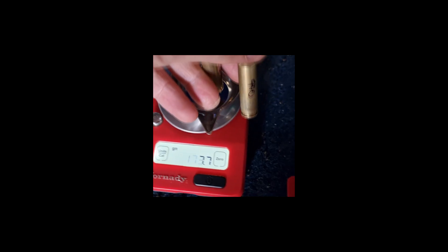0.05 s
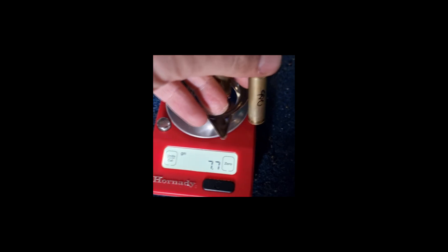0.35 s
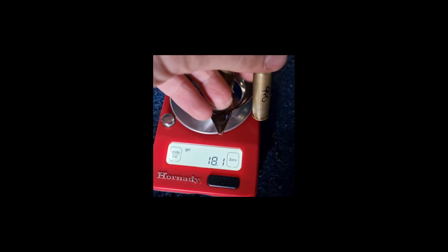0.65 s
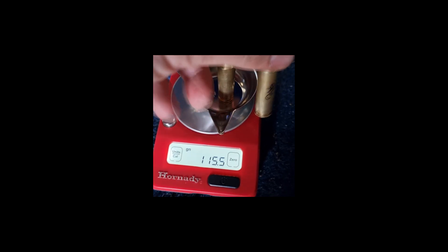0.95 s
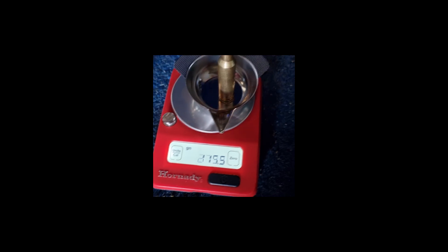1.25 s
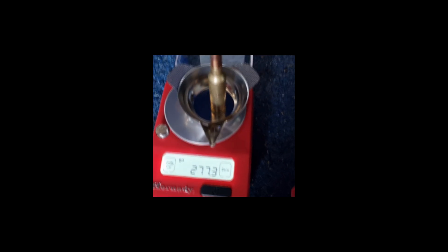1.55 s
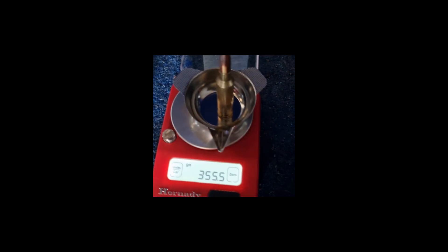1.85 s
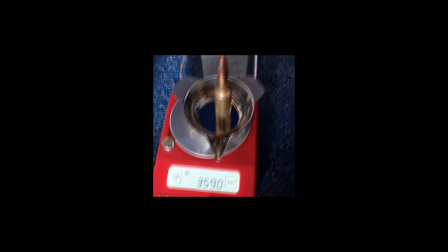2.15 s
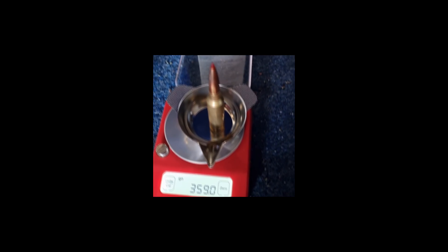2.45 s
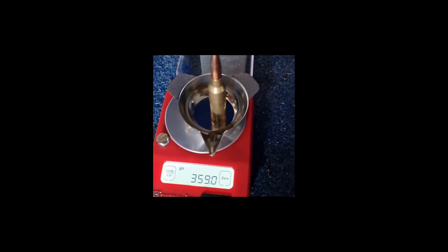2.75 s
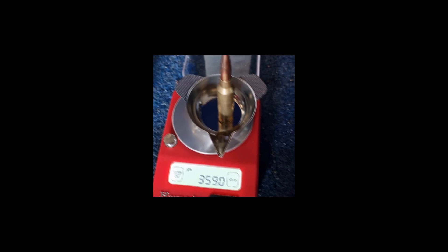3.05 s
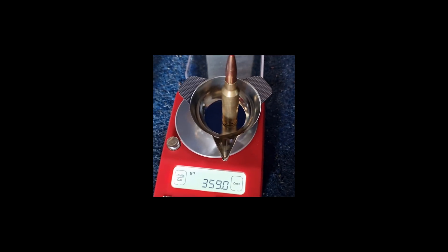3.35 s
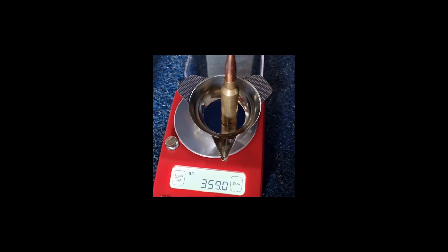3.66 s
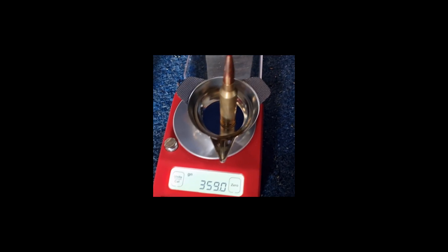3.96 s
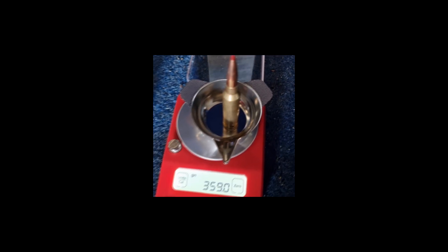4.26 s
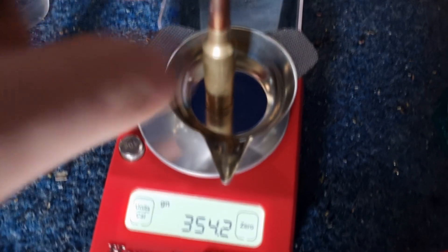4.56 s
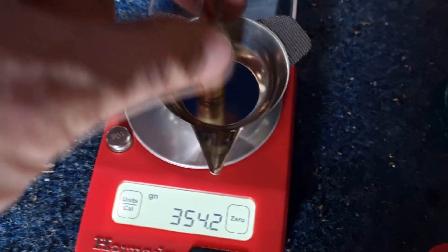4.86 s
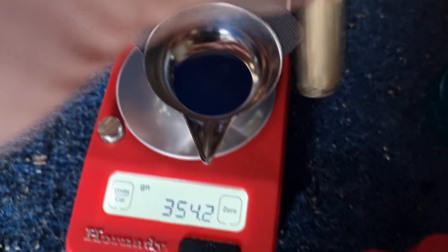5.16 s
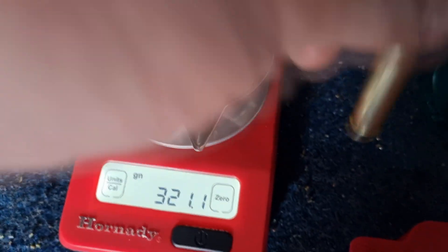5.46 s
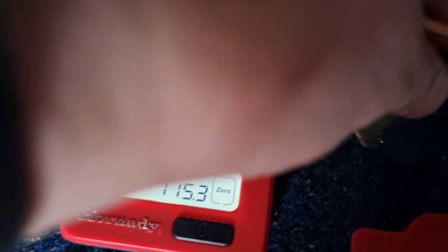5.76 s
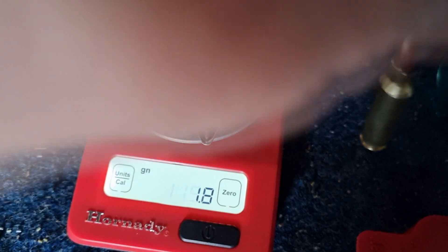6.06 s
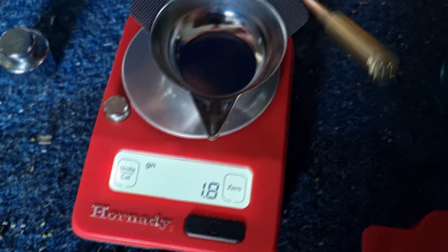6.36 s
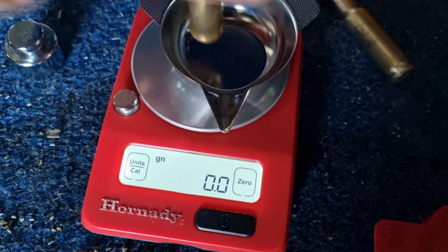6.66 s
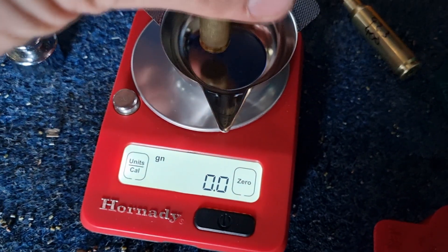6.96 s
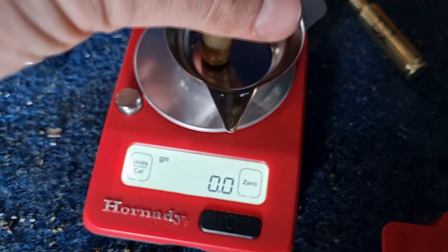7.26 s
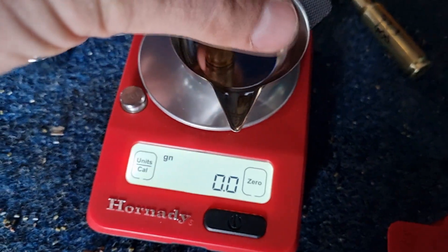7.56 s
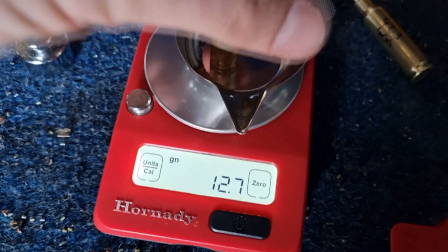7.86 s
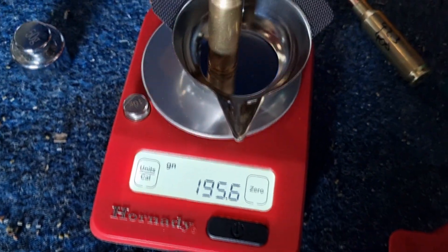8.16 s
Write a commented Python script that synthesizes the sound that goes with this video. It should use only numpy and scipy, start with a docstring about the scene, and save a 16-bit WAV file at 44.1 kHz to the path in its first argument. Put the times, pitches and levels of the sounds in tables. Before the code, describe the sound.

A brass cartridge clinks into a small steel scale pan, followed by close plastic snaps and creaks and a few soft bench thuds.

```python
"""A brass cartridge clinks and chatters into the steel pan of a small scale; pan and case both ring.
Plastic snaps and creaks as the grip shifts on a handheld camera close by.
The sound drops out briefly between two shots; then the padded bench is bumped and a case ticks on the pan.
Under it all run low rumble, microphone hiss and the fizz of the lens motor."""
import sys
import numpy as np
from scipy import signal
from scipy.fft import rfft, irfft
from scipy.io import wavfile
from scipy.ndimage import uniform_filter1d

SR = 44100
rng = np.random.default_rng(int(sys.argv[2]) if len(sys.argv) > 2 else 0)


def wav_out(sig):
    """Save sig, one row per channel (or a flat mono array), as 16-bit PCM at SR to the path in sys.argv[1]."""
    wavfile.write(sys.argv[1], SR, np.round(np.clip(np.atleast_2d(sig).T, -1, 1) * 32767).astype(np.int16))


N = 361962
TIME = np.arange(N) / SR
EVENT_TIME = TIME[:SR // 2]
GAP_START_S, GAP_END_S = 4.407, 4.445
SECOND_SHOT = TIME > GAP_START_S


def amp(db):
    return 10 ** (np.asarray(db) / 20)


def unit_rms(x):
    return x / np.sqrt(np.mean(x ** 2) + 1e-20)


def unit_blow(x):
    """Scales to the energy of 10 ms at rms 1."""
    return x / np.sqrt(np.mean(x ** 2) * x.shape[-1] / (SR / 100))


def at_hz(curve, hz):
    knots_hz, values = np.transpose(curve)
    return np.interp(np.log(hz + 1), np.log(knots_hz + 1), values)


def gain_curve(rows):
    return amp(np.interp(TIME, *np.transpose(rows)))


def flicker(depth_db, per_s):
    knots_s = np.arange(0, N / SR + 1, 1 / per_s)
    return amp(depth_db * np.interp(TIME, knots_s, rng.standard_normal(len(knots_s))))


def add(mix, start_s, sound):
    part = mix[:, round(start_s * SR):][:, :sound.shape[-1]]
    part += sound[..., :part.shape[1]]


def colour(x, spectrum, tilt=0, size=4096):
    """Minimum-phase filter; tilt in dB per octave from 400 to 5000 Hz."""
    hz = abs(np.fft.fftfreq(size, 1 / SR))
    db = at_hz(spectrum, hz) + tilt * np.log2(np.clip(hz, 400, 5000) / 1000)
    log_response = np.conj(signal.hilbert(np.log(amp(db))))
    taps = np.fft.ifft(np.exp(log_response)).real
    return signal.oaconvolve(x, taps[None, :size // 2], axes=1)[:, :x.shape[1]]


# Left-right likeness: freq_hz, correlation
MIC_CORRELATION = [(60, 0.89), (130, 0.97), (300, 0.87), (550, 0.62), (1000, 0.5), (2200, 0.0033),
                   (5000, 0.032)]

def noise(size):
    """White noise at two microphones, alike in the bass, unrelated in the treble."""
    left, other = rfft(rng.standard_normal((2, size)))
    likeness = at_hz(MIC_CORRELATION, np.fft.rfftfreq(size, 1 / SR))
    return irfft([left, likeness * left + np.sqrt(1 - likeness ** 2) * other], size)


# Rumble spectrum: freq_hz, density_db
RUMBLE_SPECTRUM = [(15, -36), (28, -16.5), (42, -2.5), (60, 2.5), (80, -1), (130, -6), (240, -12.5),
                   (430, -29), (600, -40), (1000, -54), (2000, -88.5)]
# Rumble contour, first shot: time_s, relative_db
RUMBLE_CONTOUR = [(0.0, -60.5), (0.77, -57.5), (1.11, -58.5), (1.8, -52.5), (2.5, -60.5), (4.15, -56.5),
                  (4.38, -60)]

def rumble():
    """Low wavering noise, duller in the second shot."""
    low = unit_rms(colour(noise(N), RUMBLE_SPECTRUM))
    dull = unit_rms(colour(low, [(60, 0.5), (130, -7.0), (300, -7.5)]))
    first = low * gain_curve(RUMBLE_CONTOUR) * amp(3) * amp([[-0.9], [0.9]])
    second = dull * amp(-61) * amp([[1.5], [-1.5]])
    return np.where(SECOND_SHOT, second, first) * flicker(depth_db=3.0, per_s=19)


# Hiss spectrum: freq_hz, density_db
HISS_SPECTRUM = [(100, 2), (500, 3.5), (1000, -0.5), (2000, -2), (3500, -2), (5000, -0.5), (6800, -5.5),
                 (8500, -10.5), (10500, -7), (13000, 1), (16000, -1)]

def hiss():
    """Steady self-noise of the microphones."""
    return amp(-74.5) * unit_rms(colour(noise(N), HISS_SPECTRUM))


def fizz(spectra, effort, left_db, right_db):
    """Motor noise reaches each microphone through the camera's own resonances."""
    sides = [unit_rms(colour(rng.standard_normal((1, N)), spectrum)) for spectrum in spectra]
    return np.vstack(sides) * gain_curve(effort) * amp([[left_db], [right_db]])


def hunting(per_s, step_s, steady_power, uneven_db):
    """Gain of a motor hunting in short uneven steps, each a small surge."""
    surge = EVENT_TIME / step_s * np.exp(1 - EVENT_TIME / step_s)
    steps = rng.random(N) < per_s / SR
    strength = amp(uneven_db * np.minimum(rng.standard_normal(N), 2))
    power = steady_power + signal.oaconvolve(steps * strength ** 2, surge ** 2)[:N]
    return np.sqrt(abs(power / power.mean()))


# Fizz spectra per shot, left then right: freq_hz, density_db
FIRST_FIZZ_SPECTRA = ([(700, -16), (1900, -16.5), (2400, -3), (2850, -0.5), (3250, -9.5), (3900, -6.5),
                      (4400, -11), (4900, -3), (6000, -10), (7500, -14.5), (8800, -29), (11000, -22),
                      (13500, -11.5), (16000, -15.5)], [(700, -4), (2000, -10), (2700, -7), (3300, -10.5),
                      (3900, -3), (4400, -5), (5000, 0), (5600, -2.5), (6300, 1.5), (7600, -7), (8500, -26),
                      (13500, -9.5), (16000, -9.5)])
SECOND_FIZZ_SPECTRA = ([(2200, -27), (2900, -3.5), (3450, 2.5), (4300, -11.5), (5000, 0.5), (5600, -9.5),
                       (6000, -13), (6450, -1), (7500, -9), (8300, -34.5)], [(1900, -46), (2150, -26.5),
                       (2450, -4), (2850, 2), (3200, -3), (3550, -18.5), (4250, -21.5), (5000, -25.5),
                       (5700, -49)])
# Motor effort per shot: time_s, relative_db
FIRST_EFFORT = [(0.0, -82.5), (0.6, -84.5), (1.11, -82.5), (2.18, -78), (2.32, -81.5), (4.28, -81),
                (4.38, -78.5)]
SECOND_EFFORT = [(4.48, -75), (4.97, -71.5), (5.44, -69), (5.88, -74.5), (6.16, -72), (6.32, -69.5),
                 (7.76, -71), (8.2, -68)]

def lens_motor():
    """The motor fizzes throughout and hunts in the second shot."""
    first = fizz(FIRST_FIZZ_SPECTRA, FIRST_EFFORT, left_db=12.5, right_db=7)
    first *= flicker(depth_db=1.46, per_s=25)
    second = fizz(SECOND_FIZZ_SPECTRA, SECOND_EFFORT, left_db=-3.5, right_db=7)
    second *= hunting(per_s=37, step_s=0.0028, steady_power=0.48, uneven_db=3.5)
    second *= flicker(depth_db=1.34, per_s=14)
    return np.where(SECOND_SHOT, second, first)


def crack(t60_s, direct, contact_s):
    """A contact's force pulse plus dense scatter from things close by."""
    scatter = unit_blow(noise(len(EVENT_TIME)) * amp(-60 * EVENT_TIME / t60_s))
    pulse = unit_blow(EVENT_TIME * np.exp(-EVENT_TIME / contact_s))
    return scatter + direct * pulse


def ring(modes, spread_rad_per_khz, tilt=0):
    """Decaying modes; phase differs more between the microphones at high pitch."""
    hz, db, t60_s = np.transpose(modes)[:, :, None]
    phase = np.minimum(spread_rad_per_khz * hz / 1000, np.pi) * rng.uniform(-1, 1, (2, len(modes), 1))
    rise = 1 - np.exp(-(5 * hz * EVENT_TIME) ** 2)
    envelope = rise * amp(db + tilt * np.log2(hz / 1000) - 60 * EVENT_TIME / t60_s)
    return unit_blow((envelope * np.sin(2 * np.pi * hz * EVENT_TIME + phase)).sum(1))


# Brass on the pan: start_s, crack_db, tilt_db_per_octave, ring_db
PAN_HITS = [(0.4328, -25.5, -2, -35), (0.4364, -23, 0.1, -28), (0.5915, -51.5, 2, -59),
            (0.602, -50, 3, -50.5), (0.633, -56, 2, -67), (5.050, -77, 6, -89), (5.279, -64.5, 8.5, -83),
            (7.341, -56.5, 3.5, -63.5)]
# Contact spectrum: freq_hz, density_db
CRACK_SPECTRUM = [(60, -22.5), (100, -8.5), (400, -32.5), (650, -19), (850, -14.5), (1400, -6.5),
                  (2040, -5), (2600, -4.5), (3100, -13), (3500, -7), (5000, -9.5), (6800, -18.5),
                  (7800, -9.5), (9200, -29.5), (11000, -27.5), (14000, -16), (16000, -25.5)]
# Steel pan and brass case modes: pitch_hz, relative_db, t60_s
PAN_MODES = [(772, -17.5, 0.25), (1152, -12.5, 0.19), (1640, -10, 0.33), (2120, -2.5, .16),
             (2250, -10, 0.2), (2556, -3.5, 0.13), (2600, 4.5, 0.091), (3144, -16, .3), (3467, -2, 0.22),
             (3850, -15.5, 0.26), (4260, -13.5, .26), (4630, -17, 0.3), (6557, -15, 0.21),
             (6570, -18, 0.11), (8414, -21, 0.21)]
CASE_MODES = [(3900, -18.5, .08), (5175, 1, 0.083), (5780, -3, 0.19), (7900, -17, .15)]

def clinks():
    """Each contact cracks and rings both pan and case."""
    out = np.zeros((2, N))
    for start_s, crack_db, tilt, ring_db in PAN_HITS:
        contact = crack(t60_s=0.048, direct=0.57, contact_s=0.00002)
        contact = amp(crack_db) * unit_blow(colour(contact, CRACK_SPECTRUM, tilt))
        pan = amp(ring_db) * ring(PAN_MODES, spread_rad_per_khz=0.3)
        case_db = -18 + 0.67 * ring_db  # rings even at a light touch
        case = amp(case_db) * ring(CASE_MODES, spread_rad_per_khz=0.2)
        add(out, start_s, contact + pan + case)
    out[0] = np.roll(out[0], 14)  # reaches the right microphone first
    return out


# Brass on steel or bench: start_s, end_s, start_db, end_db, pitch_hz, width_hz, left_over_right_db
BRASS_SLIDES = [(0.59, 0.617, -48, -45, 5230, 150, 7), (0.613, 0.644, -47, -56, 5350, 200, 3),
                (0.592, 0.631, -46.5, -51, 5700, 100, -3), (4.898, 5.05, -81, -74.5, 4350, 175.6, -7),
                (5.05, 5.057, -50, -63, 4170, 400, -10), (5.297, 5.331, -67.5, -75, 4320, 696, -5),
                (6.58, 6.859, -78, -82, 1280, 450, 3)]

def scrapes():
    """Sliding brass feeds one narrow resonance while it moves."""
    out = np.zeros((2, N))
    for start_s, end_s, start_db, end_db, pitch_hz, width_hz, side_db in BRASS_SLIDES:
        size = len(np.arange(0, end_s - start_s, 1 / SR))
        friction = noise(len(EVENT_TIME))
        band = signal.iirpeak(pitch_hz, pitch_hz / width_hz, SR)
        squeak = unit_rms(signal.lfilter(*band, signal.lfilter(*band, friction))[:, -size:])
        swell = amp(np.linspace(start_db, end_db, size)) * signal.windows.tukey(size, 0.15)
        add(out, start_s, squeak * swell * amp([[side_db / 2], [-side_db / 2]]))
    return out


# Snaps in the grip or scale housing: start_s, snap_db, tilt_db_per_octave, hollow_db
PLASTIC_SNAPS = [(2.2845, -31, -1, -54), (2.294, -37, 4, -48), (2.339, -49.5, -4.5, -54),
                 (2.7308, -30, -0.5, -32), (3.3191, -43.5, 3.5, -43.5), (3.5205, -40.5, -3, -46),
                 (4.1056, -29.5, 7.5, -28.5), (4.119, -25.5, -1.5, -32), (7.341, -64.5, -0.5, -73)]
# Hollow plastic modes: pitch_hz, relative_db, t60_s
PLASTIC_MODES = [(345, -13, .09), (572, -3, .05), (865, 6, .06), (907, -6.5, .09), (1015, -8, 0.12),
                 (1132, -10.5, 0.16), (1220, -7, 0.11), (1448, -1, .07), (1480, -4, 0.077),
                 (2050, -13.5, .07), (2664, -8, .06), (3270, -15, 0.065), (4400, -20.5, .06)]
# Snap and creak spectrum: freq_hz, density_db
PLASTIC_SPECTRUM = [(60, -27.5), (120, -17), (260, -16.5), (400, -6.5), (540, -3), (850, 2), (1150, -1.5),
                    (1450, -5.5), (1850, -8.5), (2600, -7.5), (3400, -16.5), (5400, -20.5), (6400, -33),
                    (7800, -31.5), (8600, -50.5), (13000, -44.5), (16000, -44)]

def snaps(seat_s=0.0054, seat_db=-3):
    """Plastic gives, then seats more softly, each time with a low push and a hollow ring."""
    out = np.zeros((2, N))
    push_time = EVENT_TIME / 0.00026
    push = unit_blow(np.gradient(push_time ** 3 * np.exp(-push_time)))
    for start_s, snap_db, tilt, hollow_db in PLASTIC_SNAPS:
        push_db = snap_db - 22 - 3.8 * tilt  # brighter snaps push less
        for delay_s, stage_db in [(0, 0), (seat_s, seat_db)]:
            contact = crack(t60_s=0.052, direct=0.13, contact_s=0.00015)
            snap = amp(snap_db) * unit_blow(colour(contact, PLASTIC_SPECTRUM, tilt))
            hollow = amp(hollow_db) * ring(PLASTIC_MODES, spread_rad_per_khz=0.8, tilt=tilt)
            add(out, start_s + delay_s, amp(stage_db) * (snap + hollow + amp(push_db) * push))
    return out


# Sliding plastic: start_s, swell_s, fade_s, peak_db, tilt_db_per_octave
PLASTIC_CREAKS = [(2.659, 0.068, 0.0085, -39.5, -2.5), (3.173, 0.038, 0.021, -55.5, -1.5),
                  (3.29, 0.03, .004, -51, 1.5), (3.504, 0.0026, 0.027, -46.5, 2.5),
                  (4.1005, .005, .018, -29, 3.5)]

def creaks(range_db=17, catches_per_s=900):
    """Plastic slips in small catches, swelling and fading."""
    out = np.zeros((2, N))
    for start_s, swell_s, fade_s, peak_db, tilt in PLASTIC_CREAKS:
        below_db = np.interp(EVENT_TIME, [0, swell_s, swell_s + fade_s], [range_db, 0, range_db])
        swell = amp(peak_db - below_db) * (EVENT_TIME < swell_s + fade_s)
        friction = noise(len(EVENT_TIME))
        catches = rng.random(len(EVENT_TIME)) < catches_per_s / SR
        creak = unit_rms(colour(friction * (0.3 + 2.5 * catches), PLASTIC_SPECTRUM, tilt))
        add(out, start_s, swell * creak)
    return out


# Bumps on the bench: start_s, thud_db, tick_db
BENCH_HITS = [(3.452, -49.5, -69), (4.453, -58.5, -63.5), (4.5277, -44.5, -54.5), (6.2806, -23.5, -38.5),
              (6.402, -26, -48), (6.408, -24, -40), (6.491, -31, -49.5), (6.553, -35, -57),
              (6.570, -32, -49)]
# Bench top modes: pitch_hz, relative_db, t60_s
BENCH_MODES = [(118, -7.5, 0.061), (156.6, 3, 0.048), (178, -9.5, 0.044), (326.6, -7.5, 0.054),
               (422, -11, 0.046), (529, -18.5, 0.039)]
# Padded contact spectrum: freq_hz, density_db
TICK_SPECTRUM = [(30, -27), (120, -12), (340, -3), (520, -8), (780, -19.5), (1100, -19), (1600, -19.5),
                 (2500, -31.5), (4500, -31.5), (7500, -42.5), (9000, -49.5), (15000, -44.5)]

def bumps(rebound_s=0.044, thud_step_db=-13, tick_step_db=-15.5):
    """The padded bench top swings up after a soft tick, then rocks back twice, ever weaker."""
    out = np.zeros((2, N))
    rise = 1 - np.exp(-EVENT_TIME / 0.0019)
    for start_s, thud_db, tick_db in BENCH_HITS:
        for rebound in range(3):
            swing = rise * ring(BENCH_MODES, spread_rad_per_khz=1.0)
            thud = amp(thud_db + rebound * thud_step_db) * unit_blow(swing)
            contact = crack(t60_s=0.09, direct=0.068, contact_s=0.0004)
            tick = amp(tick_db + rebound * tick_step_db) * unit_blow(colour(contact, TICK_SPECTRUM))
            add(out, start_s + rebound * rebound_s, thud + tick)
    return out


# Room decay: freq_hz, t60_s
ROOM_DECAY = [(100, 0.4), (300, 0.29), (900, 0.31), (2500, 0.38), (5000, 0.38), (9000, 0.28), (15000, 0.17)]
# Tail spectrum: freq_hz, gain_db
ROOM_SPECTRUM = [(100, 3.5), (300, -0.5), (900, -6), (2500, -1.5), (5000, 0), (8000, -2), (15000, 5)]

def room(x, wet_db, build_s=0.0055):
    """Small room: a diffuse tail builds quickly and dies at its own rate in each band."""
    hz, t, bands = signal.stft(noise(len(EVENT_TIME)), SR, nperseg=256)
    decay = amp(-60 * t / at_hz(ROOM_DECAY, hz)[:, None])
    tail = signal.istft(bands * decay, SR, nperseg=256)[1][:, :len(EVENT_TIME)]
    tail *= 1 - np.exp(-(EVENT_TIME / build_s) ** 2)
    tail = colour(tail / np.linalg.norm(tail[0]), ROOM_SPECTRUM)
    return x + amp(wet_db) * signal.fftconvolve(x, tail, axes=1)[:, :N]


def scene():
    brass = room(clinks(), wet_db=-10) + room(scrapes(), wet_db=-18)
    plastic = room((snaps() + creaks()) * amp([[1.1], [-1.1]]), wet_db=-10)
    bench = room(bumps(), wet_db=-8.5)
    return brass + plastic + bench + rumble() + hiss() + lens_motor()


def record(dry, low_hz=32, high_hz=15900):
    """Microphone bass roll-off, silence between the shots, band limit."""
    heard = signal.sosfilt(signal.butter(2, low_hz, "highpass", fs=SR, output="sos"), dry)
    running = (TIME < GAP_START_S) | (TIME > GAP_END_S)
    gate = uniform_filter1d(running.astype(float), size=40)
    lowpass = signal.firwin(511, high_hz, window=("kaiser", 9), fs=SR)
    return signal.oaconvolve(heard * gate, lowpass[None], "same")


dry = scene()
out = record(dry)
wav_out(out)
```